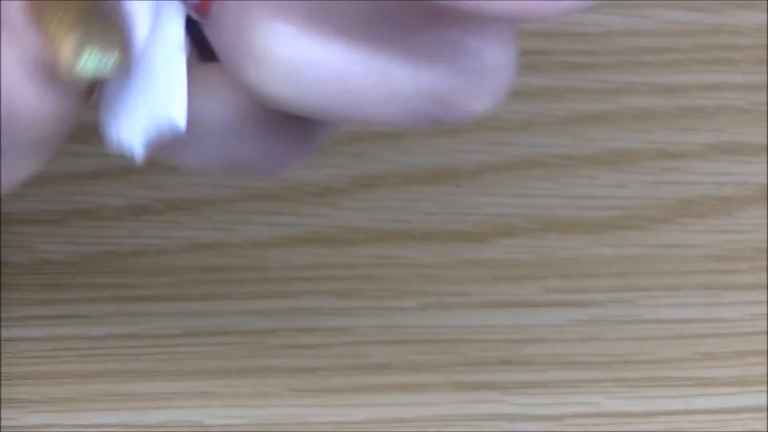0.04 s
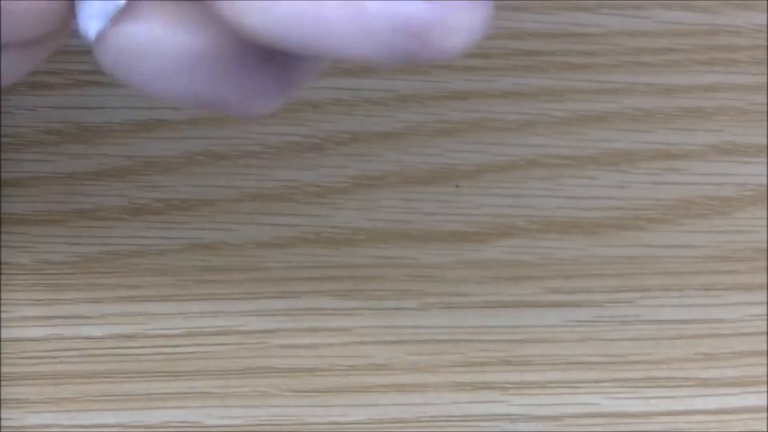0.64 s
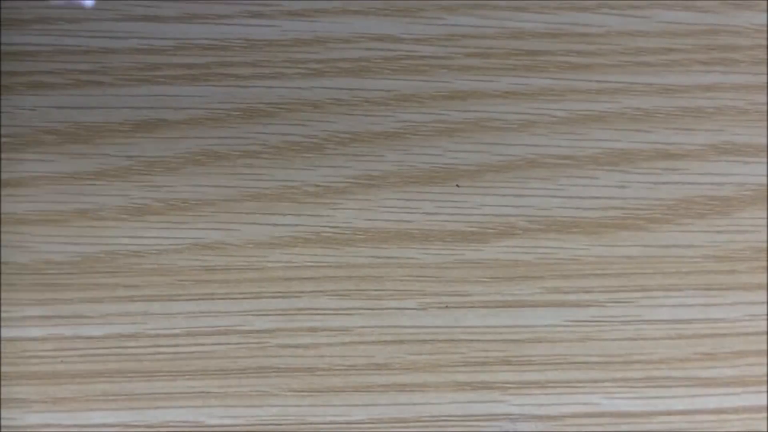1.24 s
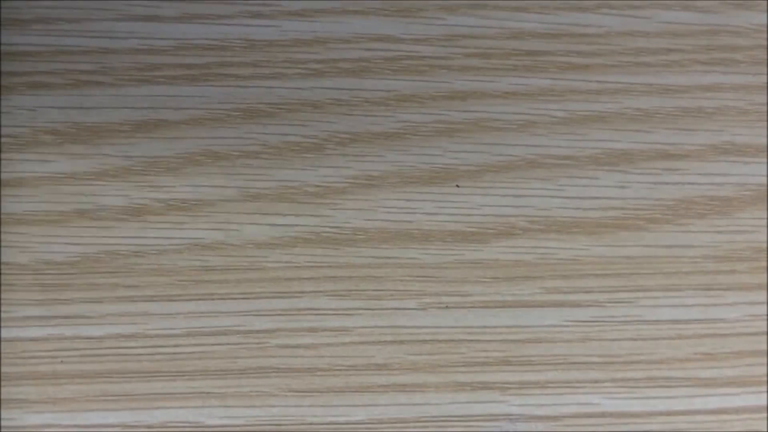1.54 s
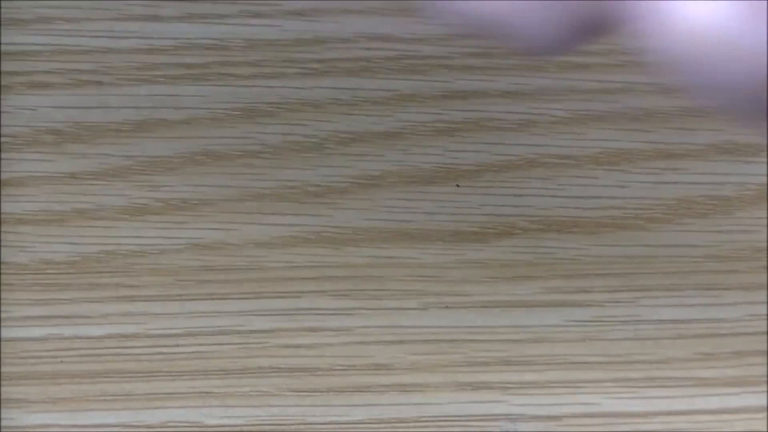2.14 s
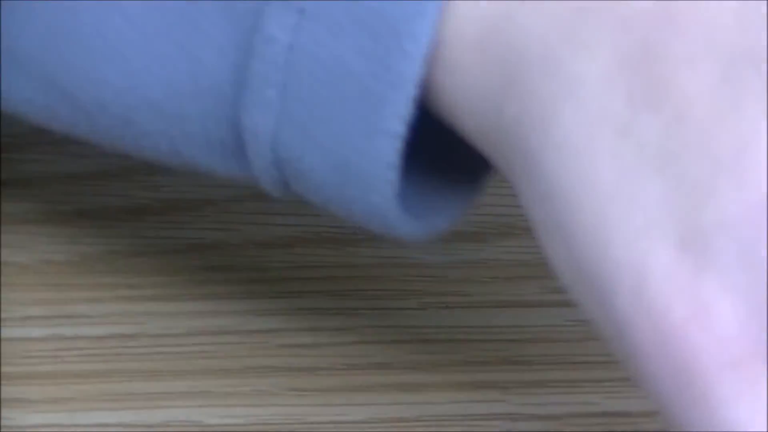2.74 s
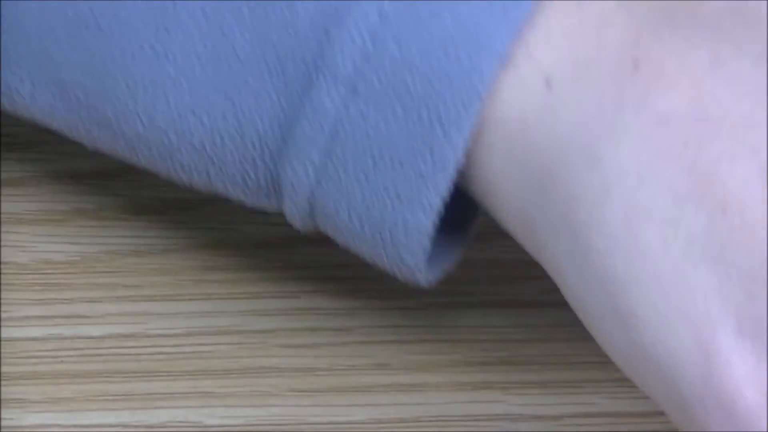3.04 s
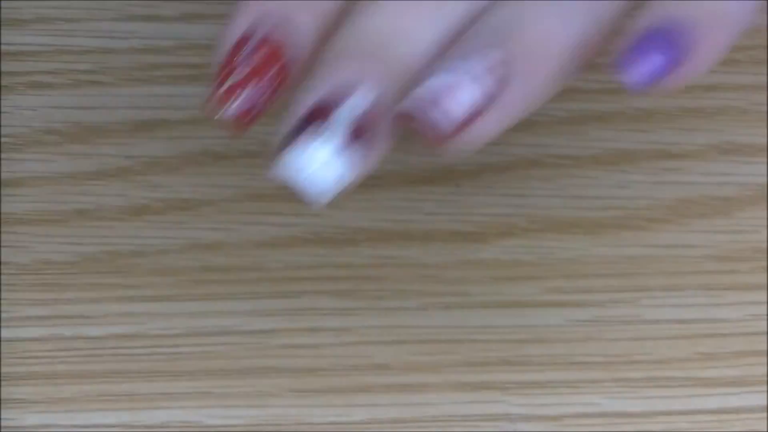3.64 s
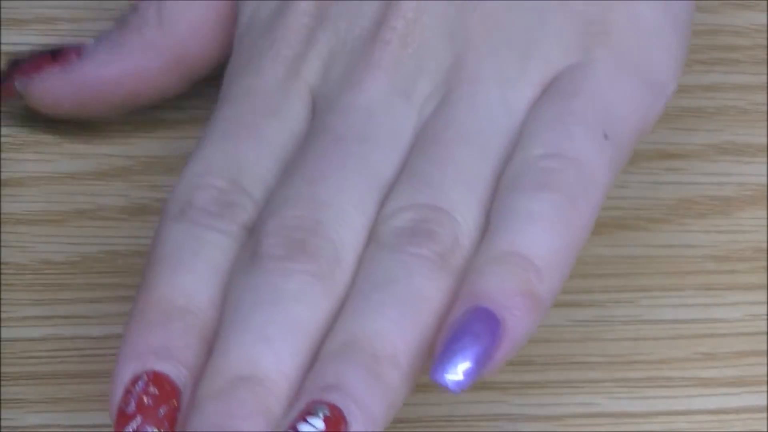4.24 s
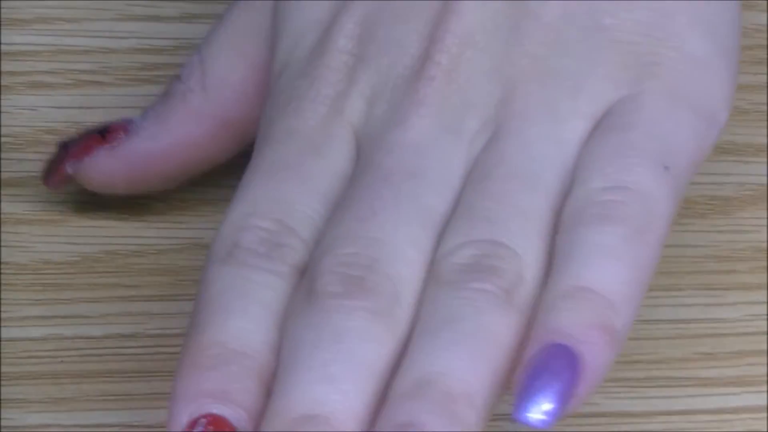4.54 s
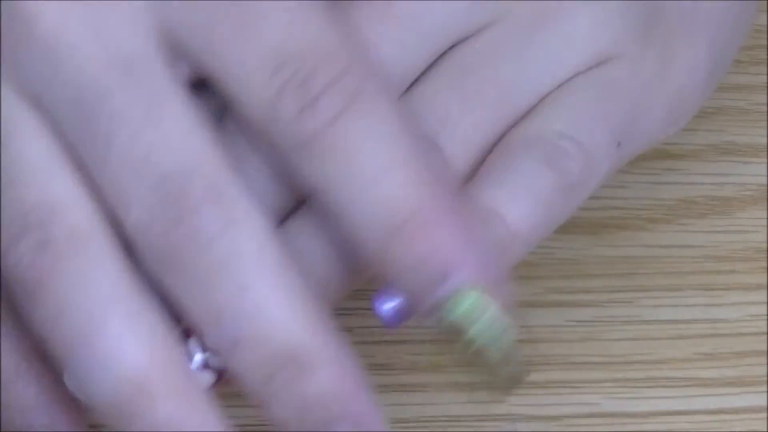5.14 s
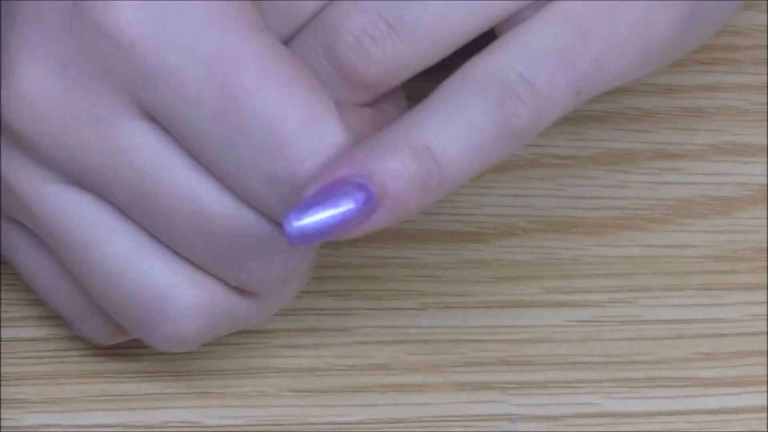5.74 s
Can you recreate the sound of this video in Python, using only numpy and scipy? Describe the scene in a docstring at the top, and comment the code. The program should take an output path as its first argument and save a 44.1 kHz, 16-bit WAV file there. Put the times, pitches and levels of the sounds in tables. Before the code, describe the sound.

A dry pad rubs faintly over fingernails with light regular clicks, then a hand bumps a wooden table and nails tap sharply.

```python
"""Close above a wooden table in a small, quiet room, a dry pad rubs to and fro over long hard fingernails: a
grainy hiss with brief stick-slip judders, over a faint hum. Something loose rocks and clicks lightly about four
times a second, later weaker and with gaps. From 2.7 s the rubbing and hum stop; an arm bumps the table and a
hand lands on it, ringing the low modes of the top. From 3 s skin and cuffs slide softly, and nails and small
hard things give a few sharp taps that ring for milliseconds and jolt the table."""
import sys
import numpy as np
from scipy import signal
from scipy.fft import rfft, irfft
from scipy.io import wavfile

SR = 44100
rng = np.random.default_rng(int(sys.argv[2]) if len(sys.argv) > 2 else 0)


def master(y):
    """Save y as 16-bit WAV."""
    cut = np.clip(np.atleast_2d(y).T, -1, 1)
    pcm = np.round(cut * 32767)  # scale
    wavfile.write(sys.argv[1], SR, pcm.astype(np.int16))


N = 260190
TIME = np.arange(N) / SR

# Landings of the loose part. Each row: time in seconds, strength in dB.
CLICK_HITS = [(0.0608, -33.5), (0.2903, -33.5), (0.5132, -34), (0.7407, -35), (0.968, -35), (1.195, -35),
              (1.4202, -36.5), (1.6537, -37.5), (1.8833, -35), (2.101, -36), (2.3431, -39), (2.5456, -43.5),
              (2.795, -43.5), (3.243, -44), (3.4794, -40.5), (3.703, -45), (3.9088, -43), (4.561, -47.5),
              (4.818, -42), (5.0492, -44), (5.2511, -40)]
# Sharp taps. Each row: time in seconds, level in dB, lower and upper resonance in Hz, split as a
# fraction of each resonance, relative crack in dB, relative room send in dB, table jolt in dB.
TAP_HITS = [(3.0483, -10.5, 3250, 5340, 0.081, -1.5, -13.5, -42),
            (3.1880, -36, 3200, 4660, 0.15, -1, -6, -77), (4.0558, -27.5, 2220, 4760, 0.11, -9, 3, -60),
            (4.0598, -9, 2600, 4600, 0.036, -27, -22, -35), (4.0617, -26, 2540, 3320, 0.14, -12, -1, -60),
            (4.0787, -36, 2980, 4530, 0.15, -30, -23, -70), (4.3095, -31, 2120, 2870, 0.072, -12, -9, -45),
            (4.3099, -34, 2950, 4430, 0.077, -11, -3, -70), (4.3408, -39, 3220, 4220, 0.093, -19, -17, -72),
            (4.8635, -24, 3240, 4680, 0.093, -9, -12.5, -58),
            (5.3447, -7, 2730, 4430, 0.12, -3, -7.5, -31.5), (5.3537, -26, 3400, 5250, 0.11, 5, 2.5, -47),
            (5.3739, -21.5, 3330, 3850, 0.077, -3, -10, -63), (5.3895, -31, 2870, 4540, 0.088, -7, 2, -60),
            (5.403, -35, 3450, 4340, 0.055, -4, 3, -66), (5.431, -41, 3870, 5400, 0.12, 6, -1, -58),
            (5.4542, -35, 3600, 5750, 0.078, 4, -3, -60),
            (5.7681, -32.5, 3860, 5060, 0.12, 10.5, -9.5, -70)]
# Stereo image of the background. Each row: frequency in Hz, left-right correlation.
BACKGROUND_CORRELATION = [(60, 0.74), (140, 0.92), (300, 0.053), (1000, 0.05), (4000, 0.46), (9000, 0.035),
                          (16000, 0.17)]


def from_db(db):
    """Decibels to gain."""
    return 10 ** (np.asarray(db) / 20)


def rms_one(x):
    """Scale to unit power."""
    return x / np.sqrt(np.mean(x ** 2) + 1e-20)


def at_hz(points, hz):
    """Read a table on a log-frequency axis."""
    points_hz, values = np.transpose(points)
    return np.interp(np.log(np.maximum(hz, 1)), np.log(points_hz), values)


def cut(x, hz, kind, order=2):
    """Butterworth filter."""
    sos = signal.butter(order, np.clip(hz, 10, .45 * SR), kind, fs=SR, output="sos")
    return signal.sosfilt(sos, x)


def add(track, start_s, sound):
    """Mix a sound in at start_s."""
    at = round(start_s * SR)
    track[..., at:at + sound.shape[-1]] += sound[..., :N - at]


def pan(x, right_db):
    """Right louder than left by right_db."""
    return x * from_db([[-right_db / 2], [right_db / 2]])


def ring(modes, length_s, alternate=True):
    """Decaying sines, optionally alternating in sign. Each mode: Hz, level in dB, T60 in seconds."""
    t = TIME[:int(length_s * SR)]
    sign = -1 if alternate else 1
    return sum(sign ** k * from_db(db - 60 * t / t60_s) * np.sin(2 * np.pi * hz * t)
               for k, (hz, db, t60_s) in enumerate(modes))


def scatter(x, low_hz, high_hz, width_hz, count):
    """Waves reach the surface by many paths: all-pass sections smear a blow and keep its colour."""
    centres_hz = low_hz + (high_hz - low_hz) * (np.arange(count) + rng.random(count)) / count
    radius = np.exp(-np.pi * width_hz / SR)
    bends = -2 * radius * np.cos(2 * np.pi * centres_hz / SR)
    return signal.sosfilt([[radius ** 2, b, 1, 1, b, radius ** 2] for b in bends], x)


def stereo_noise(spectrum, correlation):
    """Unit-power noise from rows of (Hz, dB) and (Hz, left-right correlation)."""
    hz = np.arange(N // 2 + 1) * SR / N
    mid, side = rfft(rng.standard_normal((2, N)))
    alike = np.clip(at_hz(correlation, hz), -1, 1)
    white = np.sqrt(1 + alike) * mid + np.sqrt(1 - alike) * side * [[1], [-1]]
    return rms_one(irfft(white * from_db(at_hz(spectrum, hz)), N))


def flicker(rate_hz, depth_db):
    """Random gain of unit power."""
    knots_s = np.arange(0, TIME[-1] + 1, 1 / rate_hz)
    return rms_one(from_db(depth_db * np.interp(TIME, knots_s, rng.standard_normal(len(knots_s)))))


def swell(start_s, length_s):
    """Stroke speed: a half sine from rest to rest."""
    return np.sin(np.pi * np.clip((TIME - start_s) / length_s, 0, 1))


def pad_rub(snaps_per_s=1500, snap_spread_db=4, grit_db=-15, grit_hz=10500):
    """Fibres catch and let go on the nail: a fine-grained hiss, scratchier on the rim."""
    # To-and-fro strokes, then single wipes. Each row: start and length in seconds, level in dB,
    # rim share from 0 to 1.
    strokes = [(0.125, 0.067, -49, 0.28), (0.209, 0.092, -51, 0.02), (0.326, 0.093, -58, 0),
               (0.442, 0.095, -52, 0.1), (0.562, 0.11, -52.5, 0.2), (0.689, 0.065, -52, 0.14),
               (0.8, 0.089, -47.5, 0.1), (0.926, 0.046, -50.5, 0), (1.046, 0.059, -53, 0.2),
               (1.152, 0.07, -51.5, 0), (1.283, 0.07, -51, 0.01), (1.404, 0.049, -47, 0.16),
               (1.498, 0.077, -50.5, 0), (1.61, 0.061, -47.5, 0), (1.657, 0.081, -45.5, 0.32),
               (2.082, 0.083, -47.5, 0), (2.149, 0.056, -41, 0.55), (2.616, 0.066, -52.5, 0.25),
               (2.673, 0.08, -54.5, 0.2)]
    # Friction spectra on face and rim. Each row: frequency in Hz, relative density in dB.
    face_spectrum = [(500, -11.5), (1300, -23.5), (2300, -11), (3800, -11.5), (4600, 1), (5200, 1.5),
                     (5800, -4), (7000, -16), (8600, -8.5), (10200, -4.5), (11500, -20), (13000, -17),
                     (16000, -24)]
    rim_spectrum = [(500, 5), (1300, -1), (2400, 10.5), (3300, 13), (4400, 15), (5300, -25), (6600, -5),
                    (8500, -7), (10000, 7), (11800, -8), (14000, -11), (16000, -10)]
    correlation = [(1000, 0.4), (4500, 0.99), (8000, 0.086), (15000, 0.27)]
    face, rim = np.zeros((2, N))
    for start_s, length_s, db, rim_share in strokes:
        speed = from_db(db) * swell(start_s, length_s)
        face += speed * np.sqrt(1 - rim_share)
        rim += speed * np.sqrt(rim_share)
    # Single fibres snap free as tiny bright grains.
    snapping = rng.random(N) < snaps_per_s / SR
    snaps = snapping * from_db(snap_spread_db * np.minimum(rng.exponential(1, N), 4))
    grit = from_db(grit_db) * rms_one(cut(snaps * rng.standard_normal((2, N)), grit_hz, "high"))
    hiss = face * flicker(rate_hz=1700, depth_db=2.5) * stereo_noise(face_spectrum, correlation)
    scratch = rim * flicker(rate_hz=640, depth_db=4) * stereo_noise(rim_spectrum, correlation)
    return pan(hiss + scratch + (face + rim) * grit, right_db=1.7)


def pad_judder(jitter=0.19, slip_s=0.0015):
    """The pad sticks and slips on the lacquer, each slip a puff of friction in a broad resonance."""
    # Runs of slips. Each row: start and length in seconds, level in dB, slips per second, resonance in Hz.
    judders = [(0.028, 0.011, -46.5, 330, 1610), (0.337, 0.063, -52.5, 137, 3280),
               (0.57, 0.037, -55, 210, 3080), (4.446, 0.014, -54, 310, 2010)]
    out = np.zeros(N)
    for start_s, length_s, db, rate_hz, hz in judders:
        cycles = np.cumsum(rate_hz * (1 + jitter * rng.standard_normal(N)) / SR)
        since_slip_s = cycles % 1 / rate_hz
        puffs = np.exp(-since_slip_s / slip_s) * rng.standard_normal(N)
        resonance = rms_one(cut(puffs, [hz / 1.75, hz * 1.11], "band"))
        out += from_db(db) * swell(start_s, length_s) * resonance
    return out


def click_bass_db(db, usual_db=-36, follow=0.49):
    """The bass follows a click's strength only in part, so weak clicks are dull."""
    return usual_db + follow * (db - usual_db)


def light_clicks(gain_db=-10, crossover_hz=1900, vary_db=2.5, detune=0.0125, free_above_db=-36.5):
    """The loose part lands, grates for an instant and rings, a little differently each time."""
    # Modes of the loose part. Each row: frequency in Hz, level in dB, T60 in seconds.
    click_modes = [(449.6, 2.5, 0.09), (733, -9, 0.058), (1026, 2, 0.019), (1390, -7, 0.05),
                   (1607, -3, 0.039), (2254, 9, 0.014), (2610, 0, 0.022), (3096, -3, 0.12),
                   (3200, 11.5, 0.0083), (3730, 2, 0.025), (4130, 11, 0.0085), (4287, 11.5, 0.029),
                   (4910, -8, 0.055), (5170, 2, 0.024), (6500, -4, 0.01), (8900, -8, 0.015)]
    out = np.zeros(N)
    for start_s, db in CLICK_HITS:
        modes = [(hz * (1 + detune * rng.normal()), mode_db + vary_db * rng.normal(), t60_s)
                 for hz, mode_db, t60_s in click_modes]
        body = ring(modes, length_s=0.4)
        t = TIME[:len(body)]
        grit = cut(rng.standard_normal(len(t)), [1700, 5500], "band") * from_db(6.5 - 60 * t / 0.069)
        damping_db_per_s = 100 * max(free_above_db - db, 0)   # weak clicks stay in contact
        body *= from_db(-damping_db_per_s * t)
        click = scatter(body, low_hz=846, high_hz=7030, width_hz=490, count=9) + grit
        bass = cut(click, crossover_hz, "low", order=1)
        add(out, start_s, from_db(click_bass_db(db)) * bass + from_db(db) * (click - bass))
    return from_db(gain_db) * out


def rocking(murmur_hz=255, murmur_lead_s=0.087, murmur_db=-15, tip_lead_s=0.076, tip_db=-10):
    """Before each click the loose part tips with a soft bump and rocks with a short low murmur."""
    out = np.zeros(N)
    for click_s, db in CLICK_HITS:
        pitch = 1 + 0.072 * rng.normal()
        start_s = click_s - murmur_lead_s * rng.uniform(0.77, 1)
        murmur = np.sin(2 * np.pi * murmur_hz * pitch * TIME) * swell(start_s, length_s=0.073) ** 2
        out += from_db(click_bass_db(db) + murmur_db) * murmur
        modes = [(225 * pitch, -4, 0.07), (365 * pitch, -3, 0.06), (490, 0, 0.09)]
        bump = cut(ring(modes, length_s=0.15), 336, "low")
        add(out, max(click_s - tip_lead_s, 0), from_db(click_bass_db(db) + tip_db) * bump)
    return out * flicker(rate_hz=120, depth_db=4.5)


def sharp_taps(low_t60_s=0.0066, high_t60_s=0.0026, high_db=8, knock_hz=2080, knock_db_per_octave=-25):
    """Small hard things ring briefly: a knock, two split resonances, a crack. Gives (direct, send)."""
    crack_modes = [(7540, 2.5, 0.00086), (9800, -0.5, 0.0019), (11000, -2.5, 0.00096),
                   (14000, -9, 0.0013)]
    bright = cut(ring(crack_modes, length_s=0.04), 5100, "high")
    direct, send = np.zeros((2, N)), np.zeros(N)
    for start_s, db, low_hz, high_hz, split, crack_db, send_db, _ in TAP_HITS:
        knock_db = 7.5 + knock_db_per_octave * np.log2(low_hz / knock_hz)
        modes = [(knock_hz, knock_db, low_t60_s),
                 (low_hz * (1 - split), 0, low_t60_s), (low_hz * (1 + split), 0, low_t60_s),
                 (high_hz * (1 + split), high_db, high_t60_s),
                 (high_hz * (1 - split / 2), high_db, high_t60_s)]
        body = cut(ring(modes, length_s=0.04), 8000, "low", order=4)
        body = cut(body, 1950, "high")
        body = from_db(db) * scatter(body, low_hz=2240, high_hz=6120, width_hz=270, count=4)
        crack = scatter(bright, low_hz=5550, high_hz=15020, width_hz=150, count=6)
        crack *= from_db(db + crack_db)
        add(direct, start_s, body + np.array([np.roll(crack, 1), crack]))   # crack arrives later at left
        add(send, start_s, from_db(send_db) * (body + from_db(3) * crack))
    return pan(direct, right_db=2.5), send


def table_thumps(limb_low_hz=91, jolt_band_hz=(196, 770), touch_lead_s=0.0082, vary_db=4):
    """Limbs and taps shake the top: soft flesh wakes its lowest modes, knuckles and nails higher ones."""
    # Arm or hand landings. Each row: time in seconds, level in dB, contact cutoff in Hz, limb damping
    # in dB/s, rebound delay in seconds, relative rebound in dB.
    landings = [(0.038, -41.5, 300, 150, 0.02, -8), (2.7276, -23.5, 82, 385, 0.0369, -3),
                (2.9722, -22.5, 74, 59, 0.037, -6), (3.1947, -41.5, 118, 68, 0.019, 2),
                (4.0645, -20.5, 273, 30, 0.0075, -9.5), (4.3175, -28.5, 406, 58, 0.016, -8),
                (5.3852, -26.5, 64.7, 65, 0.02, -7)]
    # Modes of the top. Each row: frequency in Hz, level in dB, T60 in seconds.
    top_modes = [(62.7, -5.5, 1), (80.7, -0.2, 0.51), (115.8, -2, 0.19), (151.8, -4.5, 0.21),
                 (171, -8, 0.25), (215, -6.5, 0.16), (280, -7, 0.13), (317, -5.5, 0.1),
                 (396.5, -18.5, 0.22), (449.6, -1, 0.051), (690, -24, 0.03), (830, -8.5, 0.039),
                 (1003, -2, 0.025), (1377, -4.5, 0.021), (1620, 0.5, 0.013)]
    blows = [(start_s, jolt_db, *jolt_band_hz, 0) for start_s, *_, jolt_db in TAP_HITS]
    for start_s, db, high_hz, damping_db_per_s, rebound_s, rebound_db in landings:
        touch_hz = 2450 * (high_hz / 390) ** 2   # knuckles knock, a sleeve does not
        touch = (start_s - touch_lead_s, db - 6.5, limb_low_hz, touch_hz, 314)
        weight = (start_s, db, limb_low_hz, high_hz, damping_db_per_s)
        rebound = (start_s + rebound_s, db + rebound_db, limb_low_hz, high_hz, 28)
        blows += [touch, weight, rebound]
    out = np.zeros(N)
    for start_s, db, low_hz, high_hz, damping_db_per_s in blows:
        # Each spot favours other modes; the many weak ones between them form a toneless clatter.
        modes = [(hz, mode_db + vary_db * rng.normal(), t60_s) for hz, mode_db, t60_s in top_modes]
        top = ring(modes, length_s=0.44, alternate=False)
        t = TIME[:len(top)]
        clatter = rms_one(cut(rng.standard_normal(len(t)), [160, 480], "band", order=1))
        clatter *= from_db(-3 - 60 * t / 0.071)
        blow = (top + clatter) * from_db(db - damping_db_per_s * t)
        add(out, start_s, cut(cut(blow, high_hz, "low"), low_hz, "high"))
    return out


def skin_slides():
    """Skin and cuffs slide over wood and skin: a soft hiss that follows the speed of the hand."""
    # Hand movements. Each row: start and length in seconds, level in dB.
    slides = [(2.946, 0.1, -46.5), (3.176, 0.17, -55.5), (4.115, 0.1, -51), (4.784, 0.29, -50.5),
              (5.006, 0.26, -58)]
    # Skin friction. Each row: frequency in Hz, relative density in dB.
    skin_spectrum = [(500, -30), (1400, -2.5), (2400, 6), (3800, 6), (5500, 8.5), (7000, -8.5), (10000, -3),
                     (15000, -24)]
    speed = sum(from_db(db) * swell(start_s, length_s) for start_s, length_s, db in slides)
    return speed * stereo_noise(skin_spectrum, correlation=[(1000, 0.8), (5000, 0.82), (12000, 0.17)])


def hand_rustle():
    """Fingers and cuffs shift against each other with a muffled rustle."""
    # Rustle envelope. Each row: time in seconds, level in dB.
    rustle_levels = [(0.0, -53.5), (0.44, -56.5), (3.27, -60), (3.75, -61), (4.19, -60), (4.81, -59.5),
                     (5.34, -61.5), (5.69, -60), (5.9, -52.5)]
    # Rustle colour. Each row: frequency in Hz, relative density in dB.
    rustle_spectrum = [(40, -9), (62, 1.5), (130, -8.5), (250, 0), (380, -8.5), (530, -8), (720, -15),
                       (1500, -22.5), (6000, -30)]
    gain = from_db(np.interp(TIME, *np.transpose(rustle_levels))) * flicker(rate_hz=42, depth_db=0.5)
    return gain * stereo_noise(rustle_spectrum, BACKGROUND_CORRELATION)


def room(x, onset_s=0.00082, wall_s=0.01, wall_gain=0.24):
    """One near wall reflects; a diffuse tail dies band by band."""
    # Tail decay. Each row: frequency in Hz, T60 in seconds.
    decay_times = [(80, 0.35), (300, 0.041), (1000, 0.21), (3000, 0.2), (6000, 0.28), (14000, 0.022)]
    # Stereo image of the tail. Each row: frequency in Hz, left-right correlation.
    tail_correlation = [(80, 1), (300, 0.35), (2500, 0.75), (4500, 0.55), (8000, 0.33), (15000, -0.13)]
    t = TIME[:SR * 2 // 3]
    noise = stereo_noise([(20, 0), (20000, 0)], tail_correlation)[:, :len(t)]
    edges_hz = np.geomspace(40, 19000, 10)
    tail = np.zeros_like(noise)
    for k, (low_hz, high_hz) in enumerate(zip(edges_hz, edges_hz[1:])):
        t60_s = at_hz(decay_times, np.sqrt(low_hz * high_hz))
        tail += (-1) ** k * cut(noise, [low_hz, high_hz], "band") * from_db(-60 * t / t60_s)
    tail = rms_one(tail * np.clip(t / onset_s, 0, 1) ** 2) / np.sqrt(len(t))
    tail[:, round(wall_s * SR)] += wall_gain
    return signal.fftconvolve(np.atleast_2d(x), tail, axes=1)[:, :N]


def hum(hz=534.5, width_hz=22, level_db=-69.5, end_s=2.67, fade_s=0.13):
    """A faint, wavering hum under the rubbing."""
    tone = cut(rng.standard_normal(N), [hz - width_hz / 2, hz + width_hz / 2], "band")
    return from_db(level_db) * rms_one(tone) * np.clip((end_s - TIME) / fade_s, 0, 1)


def room_air(air_db=-55.5, drone_hz=143, drone_db=-58):
    """Quiet room noise with a low, wavering drone."""
    # Still room. Each row: frequency in Hz, relative density in dB.
    air_spectrum = [(15, -62), (28, -19), (40, -19), (57, -9), (110, -6), (230, -9), (380, -21), (650, -23),
                    (1100, -24.5), (1600, -20), (2400, -18.5), (3300, -21.5), (4800, -21.5), (7000, -26.5),
                    (12000, -28.5), (16000, -38)]
    drone_spectrum = [(drone_hz / 2, -40), (drone_hz / 1.45, -12), (drone_hz, 0),
                      (drone_hz * 1.12, -14), (drone_hz * 2, -60)]
    drone = cut(stereo_noise(drone_spectrum, BACKGROUND_CORRELATION), 640, "low")
    air = stereo_noise(air_spectrum, BACKGROUND_CORRELATION)
    return from_db(air_db) * air + from_db(drone_db) * drone


def scene():
    """Close sources, rubbing and taps slightly to the right, over the room's echo and noise."""
    taps, tap_send = sharp_taps()
    rub = pad_rub()
    chatter = light_clicks() + pad_judder()
    thumps = table_thumps()
    echo = room(tap_send + from_db(-6.5) * chatter + from_db(-1) * cut(thumps, 161, "high")
                + from_db(-9) * rub.mean(axis=0))
    direct = rub + chatter + taps + thumps + skin_slides() + hand_rustle() + rocking()
    return direct + echo + hum() + room_air()


def record(dry):
    """Steep low-pass on the top treble."""
    cutoff_hz = 15900
    return signal.sosfilt(signal.ellip(10, .1, 80, cutoff_hz, fs=SR, output="sos"), dry)


dry = scene()
out = record(dry)
master(out)
```